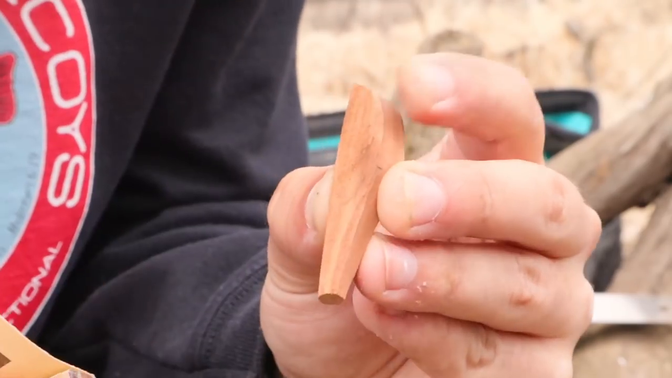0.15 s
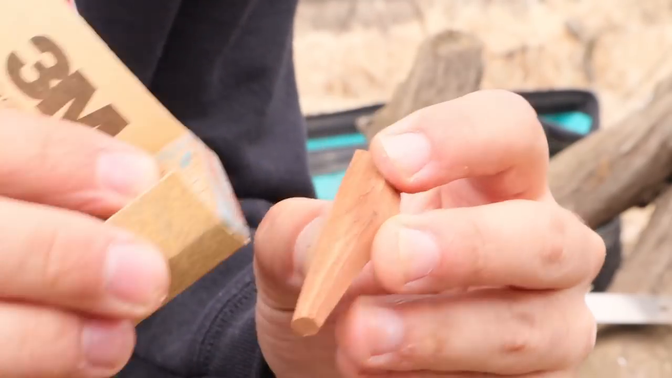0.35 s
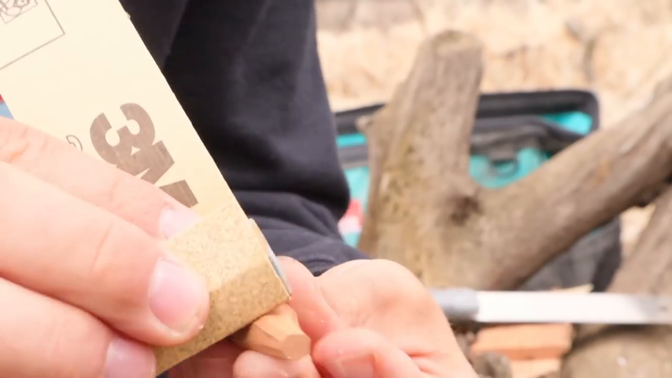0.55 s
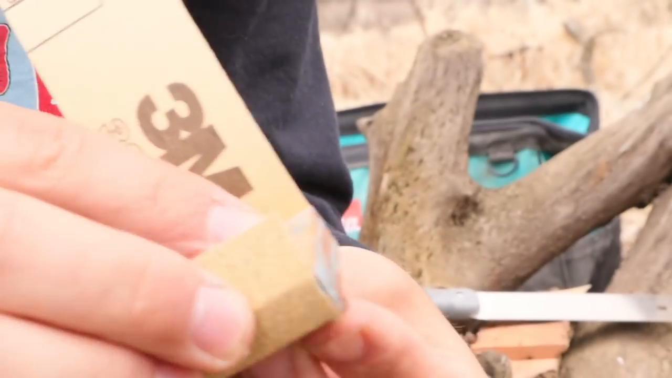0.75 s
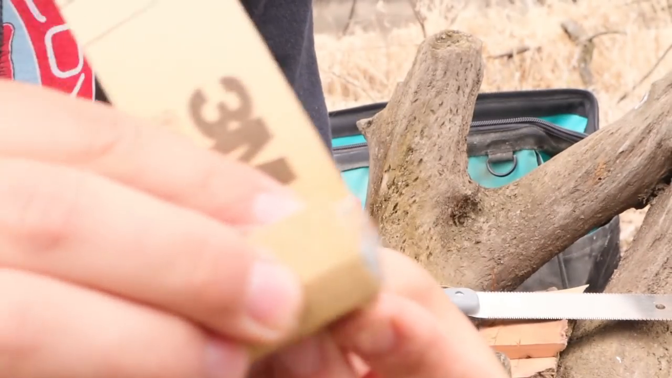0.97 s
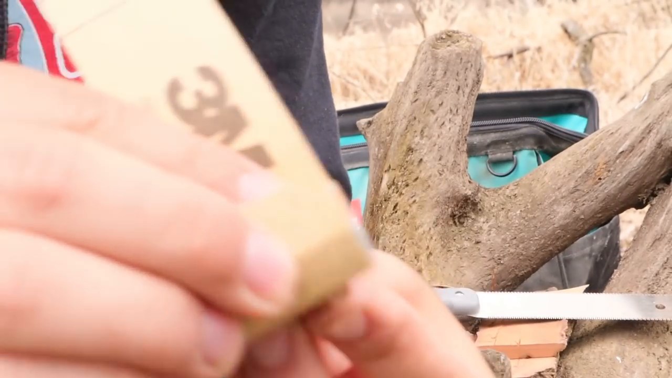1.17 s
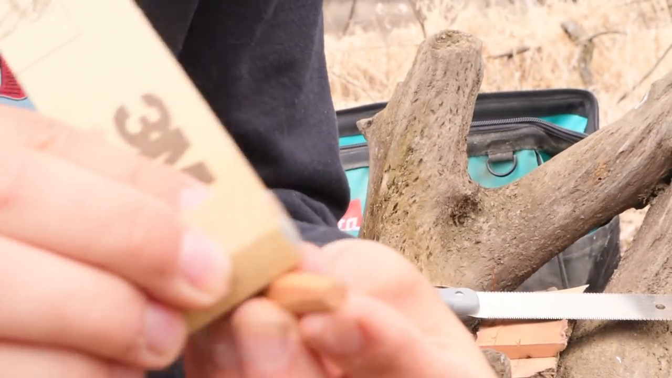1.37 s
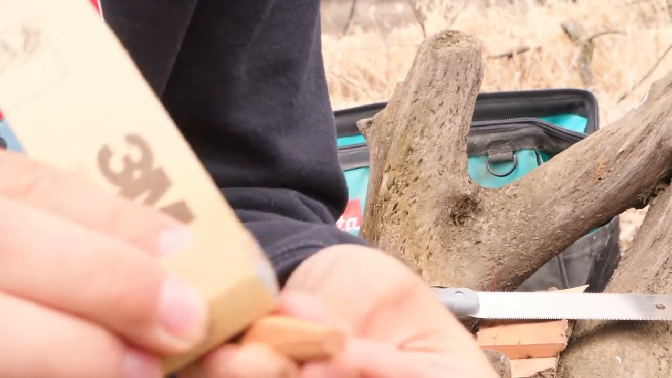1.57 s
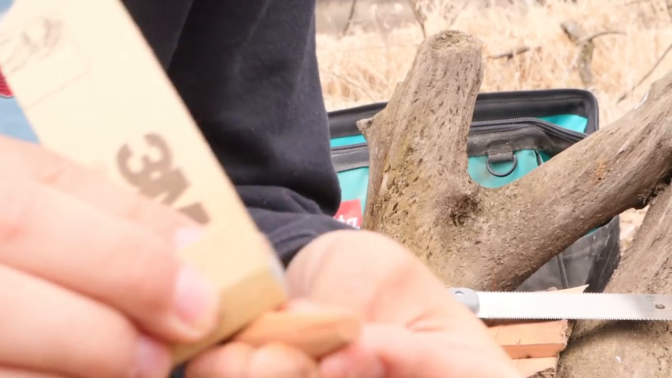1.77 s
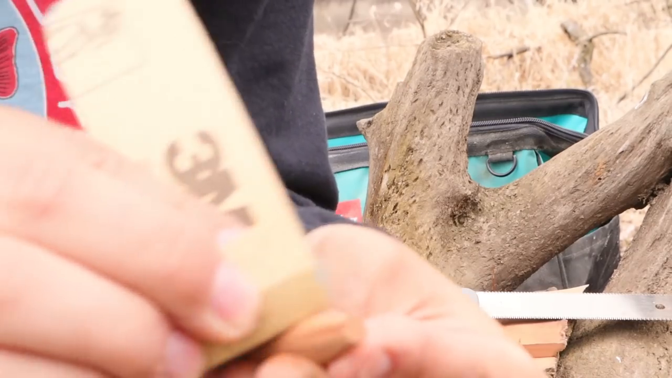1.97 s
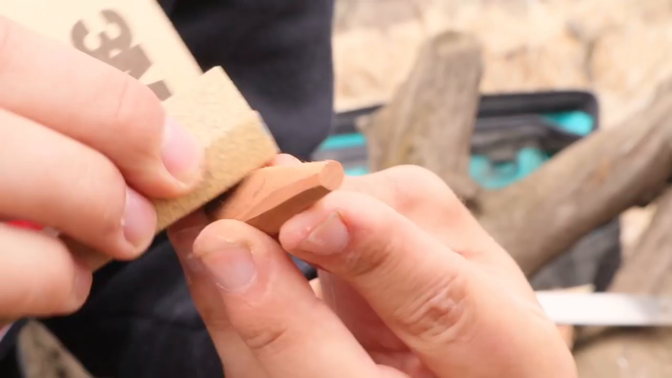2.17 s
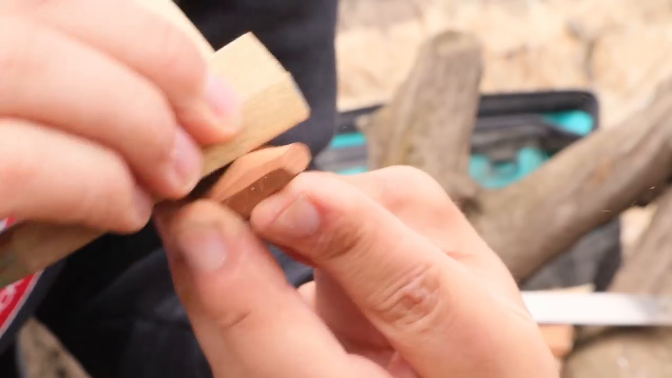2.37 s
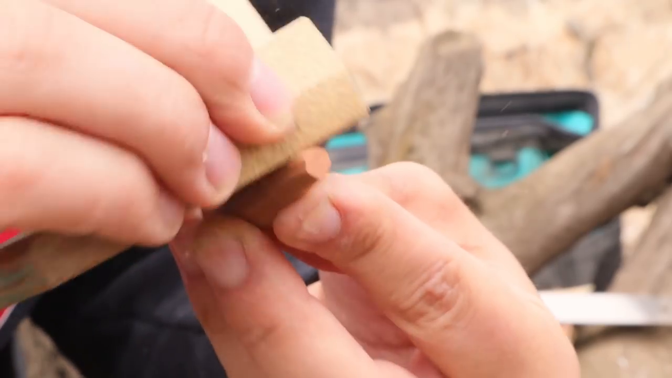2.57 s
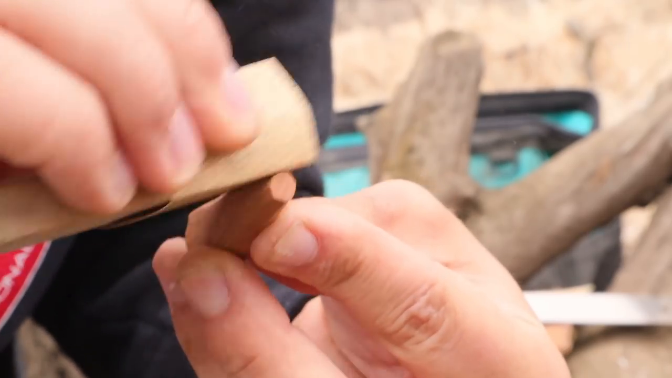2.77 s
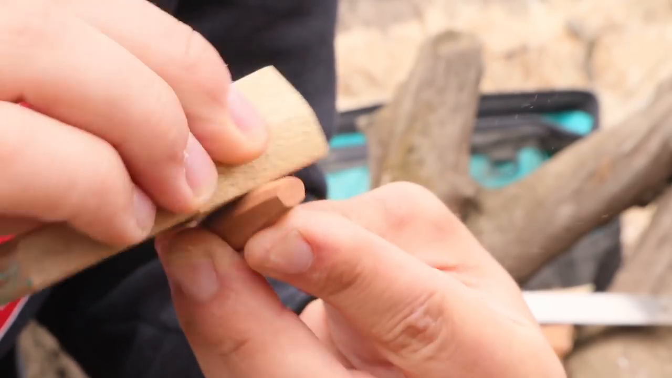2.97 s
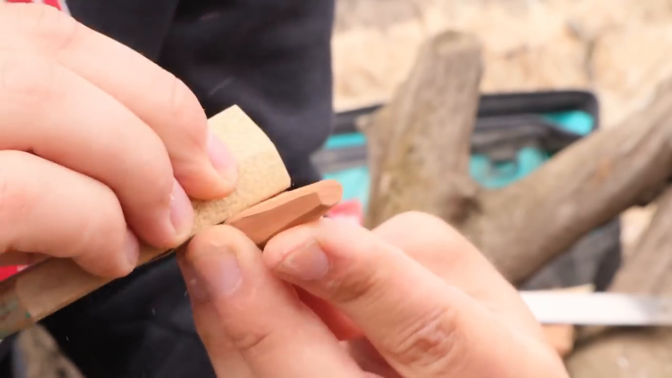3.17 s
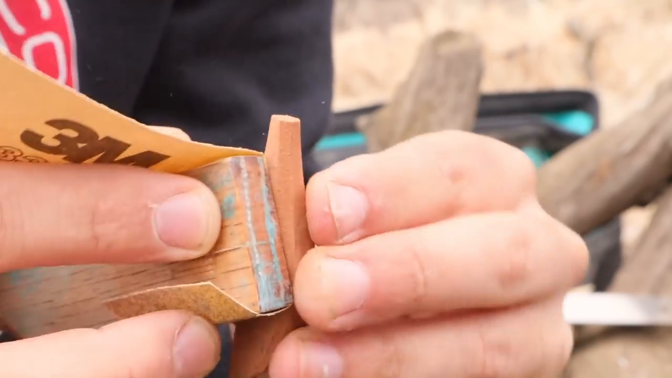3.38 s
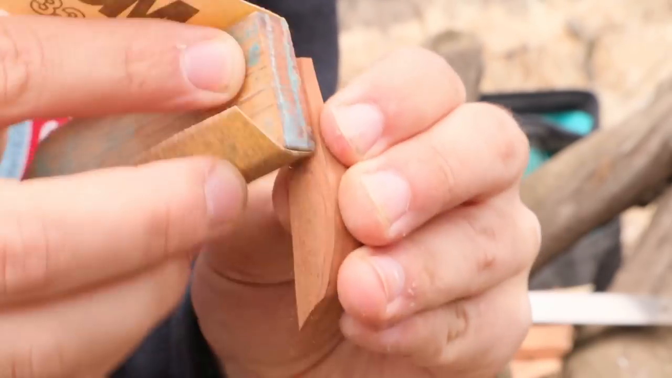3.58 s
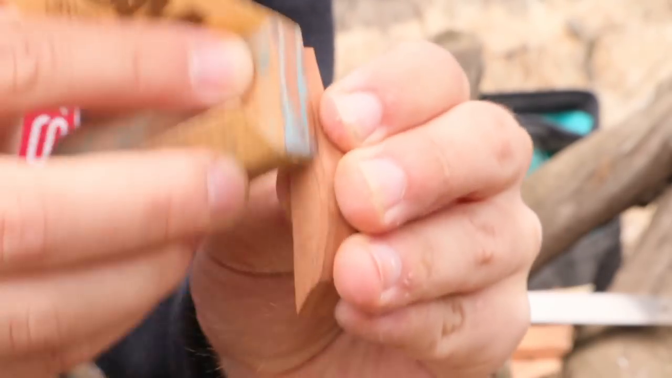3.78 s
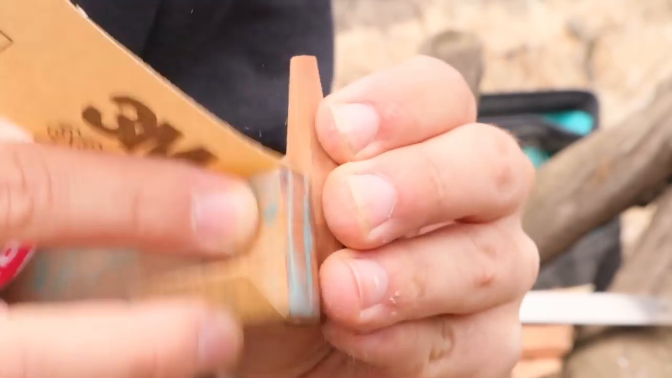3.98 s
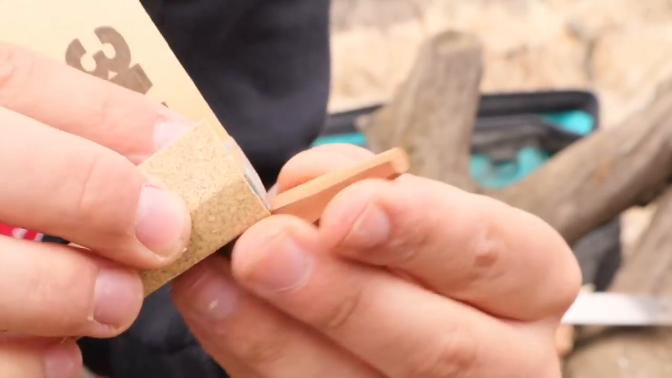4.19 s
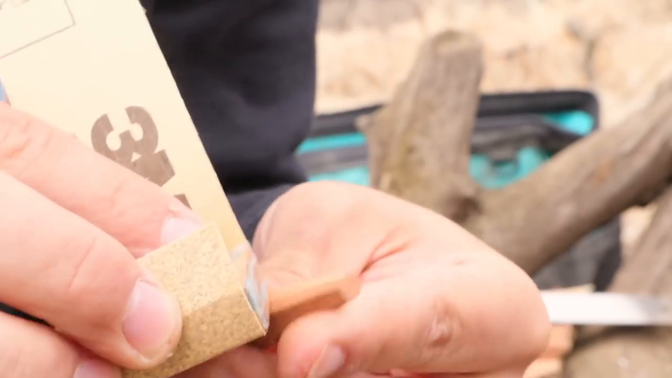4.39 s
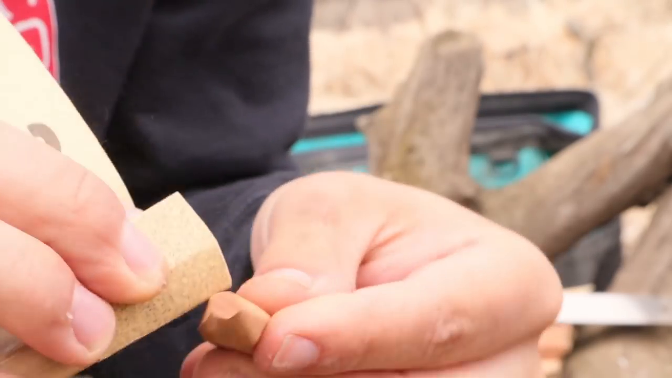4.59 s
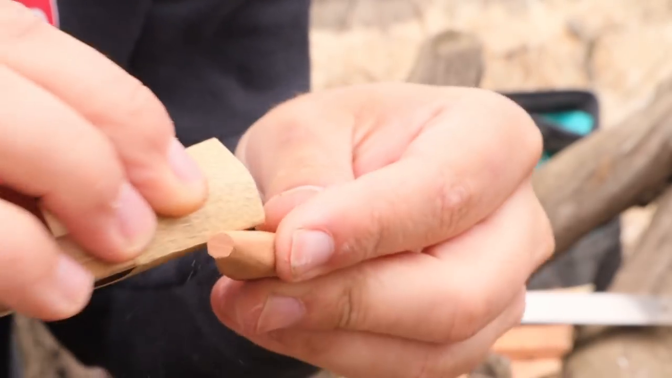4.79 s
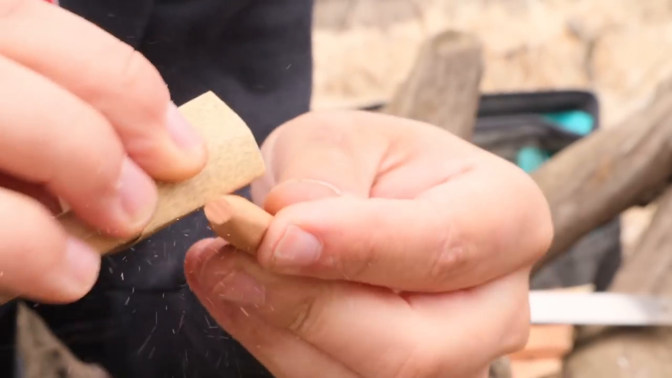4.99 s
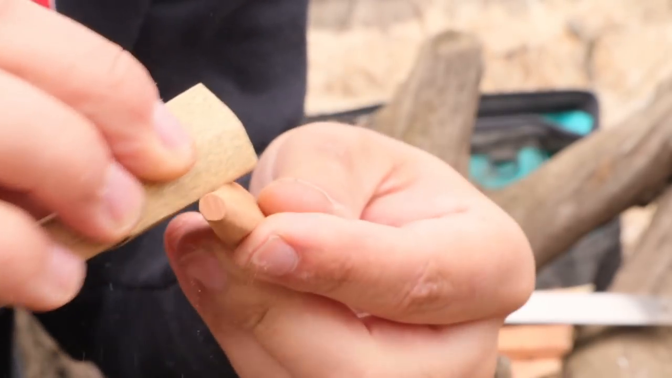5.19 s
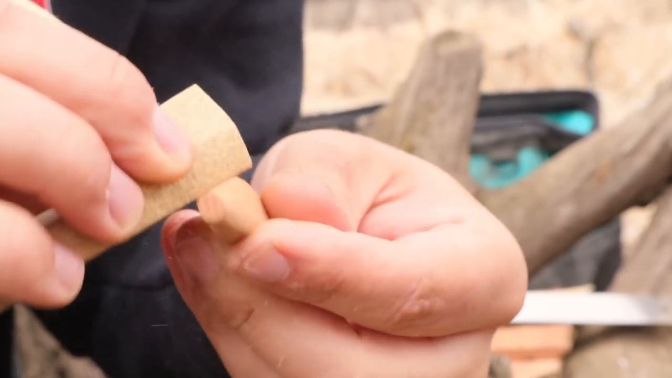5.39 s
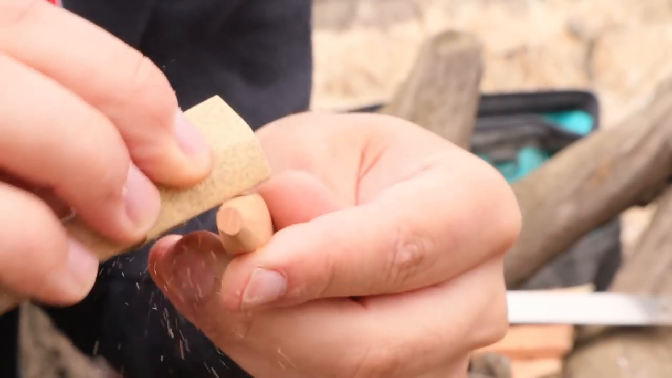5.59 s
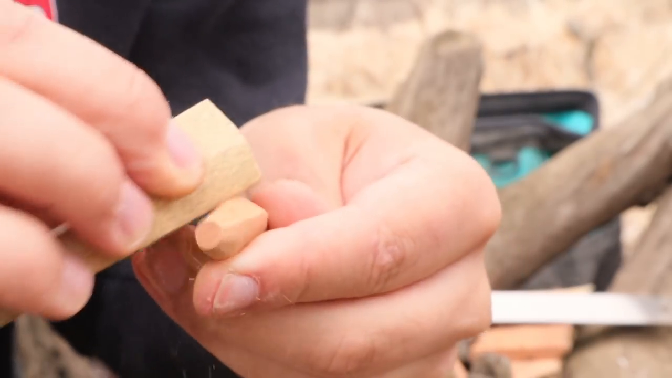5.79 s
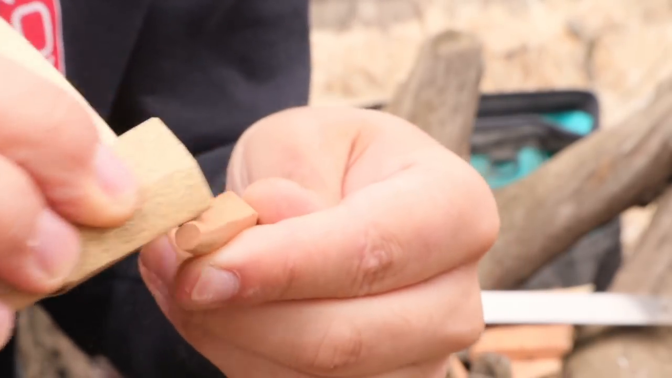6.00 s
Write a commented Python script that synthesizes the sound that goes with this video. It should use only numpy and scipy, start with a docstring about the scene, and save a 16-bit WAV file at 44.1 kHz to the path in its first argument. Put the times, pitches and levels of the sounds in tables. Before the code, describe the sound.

Quick, dry hand sanding of a small wooden piece, rasping and hissing with tiny clicks over a faint outdoor rumble.

```python
"""Outdoors, folded sandpaper is rubbed quickly back and forth over a small hand-held piece of wood.
Friction makes the sound: grit tears the fibres with a rasp and hisses while the paper slides fast.
Paper, wood and the air in the fold resonate differently in each grip, and single grains snag and click.
Behind lie a faint rumble and a far-off hum; a thin whistle passes, and the hands thud as they shift."""
import sys
import numpy as np
from scipy import signal
from scipy.fft import rfft, irfft
from scipy.io import wavfile
from scipy.ndimage import uniform_filter1d

SR = 44100
rng = np.random.default_rng(int(sys.argv[2]) if len(sys.argv) > 2 else 0)


def unload_audio(sound):
    """Save the sound as a 16-bit wav file, at the path given as the first command line argument."""
    columns = np.transpose(np.atleast_2d(sound))
    # keep every value between -1 and 1, then stretch to whole-number steps
    steps = np.round(np.clip(columns, -1, 1) * 32767)
    wavfile.write(sys.argv[1], SR, steps.astype(np.int16))


N = 266672
T = np.arange(N) / SR
BINS = np.fft.rfftfreq(N, 1 / SR)


def amp(db):
    """The decibel law: amplitude grows tenfold every 20 dB."""
    return 10 ** (np.asarray(db) / 20)


def unit(x):
    """Normalisation to an rms of 1."""
    return x / np.sqrt(np.mean(x ** 2) + 1e-20)


def colour(points):
    """A spectral envelope: gain interpolated over log frequency between (Hz, dB) points."""
    hz, db = np.transpose(points)
    return amp(np.interp(np.log(BINS + 1), np.log(hz), db))


def resonance(modes):
    """Damped resonance: modes given as (Hz, bandwidth in Hz, dB) add in power to one gain curve."""
    return np.sqrt(sum(amp(db) ** 2 / (1 + ((BINS ** 2 - hz ** 2) / (BINS * width + 1)) ** 2)
                       for hz, width, db in modes))


def shaped(x, gain):
    """Linear filtering: the spectrum is multiplied by a gain curve, and the result normalised."""
    return unit(irfft(rfft(x) * gain, N))


def wander(rate_hz):
    """Random modulation: low-passed Gaussian noise with an rms of 1."""
    return shaped(rng.standard_normal(N), np.exp(-(BINS / rate_hz) ** 2))


def grit(per_s, spread_db, patchy_db):
    """Shot noise: tiny fractures of uneven size, whose colour shifts as the contact point travels."""
    size = amp(spread_db * np.minimum(rng.exponential(1, N), 4))
    clicks = rng.choice([-1, 1], N) * size * (rng.random(N) < per_s / SR)
    spectra = signal.stft(clicks, nperseg=256, noverlap=192)[2]
    patches = uniform_filter1d(rng.standard_normal(spectra.shape), size=3, axis=0)
    patches = unit(uniform_filter1d(patches, size=13, axis=1))
    spectra *= amp(patchy_db * np.minimum(patches, 2))
    return signal.istft(spectra, nperseg=256, noverlap=192)[1][:N]


# The paper catches on the wood. Each entry: time in seconds.
CATCH_TIMES = [0.739, 0.925, 0.992, 1.031, 1.107, 1.249, 1.32, 1.34, 1.391, 1.482, 1.55, 1.667, 1.742,
               1.807, 1.847, 2.054, 2.083, 2.13, 2.998, 3.039, 3.205, 3.234, 3.259, 3.335, 3.607, 3.767,
               3.918, 3.933, 4.314, 4.726, 4.935, 4.972, 5.057, 5.27, 5.362, 5.384, 5.437, 5.474, 5.615,
               5.654, 5.784, 5.824]

def catches(depth_db=-20, fall_s=0.0038, recover_s=0.0062, light_db=-4):
    """Interrupted sliding: the gain of the hiss dips at each catch, and lightly at random as well."""
    dip_db = light_db * (.5 + .5 * np.tanh(2 * (wander(40) - 0.62)))
    for time in CATCH_TIMES:
        near = abs(T - time) < 10 * recover_s
        age = T[near] - time
        dip_db[near] += depth_db * np.exp(-(age / np.where(age < 0, fall_s, recover_s)) ** 2)
    return amp(dip_db)


# Strokes of the paper, out or back. Each row: start in seconds, length in seconds,
# relative rasp level at full speed in dB, hiss level relative to that in dB.
STROKES = [(-0.004, 0.027, -31.0, 3), (0.016, 0.064, -30, 4), (0.414, 0.062, -32.0, -7.0),
           (0.674, 0.13, -36, 3), (0.747, 0.07, -31.0, -5.5), (0.816, 0.069, -33.0, 0.5),
           (0.881, 0.078, -28.5, 1), (0.958, 0.063, -32.5, 1), (1.001, 0.065, -29.5, 0.0),
           (1.063, 0.086, -26, -1.5), (1.127, 0.094, -28, -4.5), (1.201, 0.09, -30, -1.5),
           (1.272, 0.091, -32.0, 1), (1.347, 0.076, -28, 0), (1.388, 0.12, -27.5, -2.5),
           (1.493, 0.078, -33, 4.5), (1.559, 0.055, -25.5, 1.5), (1.584, 0.14, -31, 1.5),
           (1.704, 0.069, -24, -3), (1.776, 0.061, -30.5, 2), (1.822, 0.058, -28.0, 2.5),
           (1.874, 0.091, -26, -1.5), (1.943, 0.08, -27.5, 0.0), (2.018, 0.078, -30.5, 5.5),
           (2.084, 0.088, -24, 0.0), (2.146, 0.11, -30.5, 6.5), (2.255, 0.058, -29.5, 4.5),
           (2.305, 0.074, -25.0, 1.0), (2.348, 0.098, -28.0, -1.5), (2.403, 0.15, -26.5, -2.5),
           (2.522, 0.055, -26, 1), (2.562, 0.065, -30.5, 3), (2.612, 0.081, -28.5, 0.0),
           (2.631, 0.18, -30, -2), (2.754, 0.072, -36, 4), (2.817, 0.12, -34.5, -2.5),
           (2.906, 0.056, -32.5, -0.5), (2.941, 0.11, -28.5, 0.0), (3.037, 0.027, -31.5, 10.5),
           (3.056, 0.082, -30, -1), (3.151, 0.12, -34.0, 4.5), (3.216, 0.075, -35, 12),
           (3.249, 0.12, -28, 2.5), (3.38, 0.051, -42.0, -2.5), (3.5, 0.019, -43.5, 5.5),
           (3.521, 0.12, -36, -5), (3.586, 0.09, -30.5, -1.5), (3.661, 0.062, -28, -2.5),
           (3.718, 0.067, -29.0, -3), (3.764, 0.074, -30.5, 0.5), (3.83, 0.06, -27.5, -4.5),
           (3.875, 0.13, -29.5, -0.5), (3.986, 0.072, -34.0, -2), (4.17, 0.1, -45, -2),
           (4.242, 0.131, -40.5, 0.0), (4.314, 0.27, -54.5, -1.5), (4.611, 0.1, -41.5, -0.5),
           (4.694, 0.068, -35.5, 2), (4.739, 0.1, -34.5, -0.5), (4.831, 0.065, -31.5, 1),
           (4.884, 0.058, -30, 0.5), (4.911, 0.1, -30.5, -1.5), (5.007, 0.081, -31, -0.5),
           (5.075, 0.05, -32.5, -1), (5.106, 0.078, -31, -2), (5.176, 0.059, -31.0, -0.5),
           (5.225, 0.1, -32, 0), (5.312, 0.1, -31.5, 0.0), (5.37, 0.12, -32.5, 4.5),
           (5.411, 0.17, -32.0, 0.5), (5.547, 0.098, -32.0, -0.5), (5.606, 0.085, -32.5, 0.5),
           (5.679, 0.061, -30.0, -2.5), (5.714, 0.1, -32.5, -4.5), (5.768, 0.112, -32.0, -0.5),
           (5.858, 0.068, -31.5, -1), (5.905, 0.15, -32, -2.5), (5.982, 0.073, -36.5, 1.5)]
# The resting paper barely scuffs. Each row: start in seconds, length in seconds, relative level in dB.
SCUFFS = [(0.457, 0.25, -58), (3.428, 0.067, -53)]

def strokes(stick_speed=0.53, stick_softness=0.061, hiss_floor_db=-21):
    """Sliding friction: the rasp and hiss envelopes rise with speed; the hiss cuts as the paper sticks."""
    rasp_power, hiss_power = np.zeros(N), np.zeros(N)
    for start, length, db, hiss_db in STROKES:
        during = (T > start) & (T < start + length)
        progress = ((T[during] - start) / length) ** .95  # fastest a little before the middle
        speed = abs(np.sin(np.pi * progress))  # share of full speed
        sliding = np.where(progress < .5, 1, .5 + .5 * np.tanh((speed - stick_speed) / stick_softness))
        rasp_power[during] += (amp(db) * speed ** 1.195) ** 2
        hiss_power[during] += (amp(db + hiss_db) * speed ** 0.96 * sliding) ** 2
    for start, length, db in SCUFFS:
        rasp_power += amp(db) ** 2 * abs(np.sin(np.pi * np.clip((T - start) / length, 0, 1)))
    hiss_power = hiss_power * catches() ** 2 + amp(hiss_floor_db) ** 2 * rasp_power
    return np.sqrt(rasp_power), np.sqrt(hiss_power)


# The fingers take a new grip. Each entry: start in seconds.
GRIP_TIMES = [0, 2.25, 3.15, 3.45, 4.15]
# Modes of paper and wood, one list a grip. Each row: frequency in Hz, bandwidth in Hz, gain in dB.
GRIP_MODES = [
    [(1935, 620, -7), (3090, 340, -2), (4040, 1000, -5), (5105, 203, 1), (5770, 200, 0.5),
     (8000, 3200, -7.5), (10900, 2300, -7.5)],
    [(1670, 560, -10.5), (2670, 500, -6.5), (3550, 610, -8), (4280, 490, -7), (5260, 220, -1.5),
     (5950, 180, 2.5), (6760, 300, -5.5), (8160, 1500, -5), (10300, 2700, -5)],
    [(2000, 700, -15), (3100, 1100, 5), (4040, 1300, 2.5), (4960, 1100, 8), (6230, 300, -10),
     (7100, 900, 4), (8800, 900, 4), (10500, 3000, 7.5)],
    [(1730, 410, -1), (2240, 1700, -3.5), (4070, 730, 2.5), (4920, 310, -1.5), (5920, 240, -3.5),
     (6850, 700, -14), (10600, 2400, -12.5)],
    [(1900, 1100, -4.5), (2795, 390, 2), (3850, 670, 2.5), (5280, 960, 2.5), (5750, 250, -7),
     (6930, 300, 0), (9270, 2100, -2), (10300, 1000, -6.5)],
]
# The overall spectrum of the grit. Each row: frequency in Hz, relative level in dB.
GRIT_COLOUR = [(200, -1), (550, -1), (900, 4), (1500, -1.5), (6500, -2), (7500, -5.5), (10500, -5),
               (12000, -5.5), (14000, -3.5), (16000, -11.5)]

def paper_and_wood(excitation, band):
    """Forced vibration: the grit drives the modes of paper and wood, cross-faded from grip to grip."""
    grip = np.searchsorted(GRIP_TIMES[1:], T)
    gain = band * colour(GRIT_COLOUR)
    return sum(uniform_filter1d(1. * (grip == k), size=400) * shaped(excitation, gain * resonance(modes))
               for k, modes in enumerate(GRIP_MODES))


# The hollow of folded paper and cupped fingers in each grip.
# Each row: resonant frequency in Hz, relative level in dB.
GRIP_HOLLOWS = [(1345, -39.5), (1343, -39.5), (1350, -37), (1610, -49.5), (1330, -39)]

def hollow(rasp, usual_rasp_db=-32, pole_width_hz=420, drift=0.085):
    """Cavity resonance: grit rings the air in the fold, whose pitch drifts as the fingers move."""
    grip = np.searchsorted(GRIP_TIMES[1:], T)
    hz, level_db = uniform_filter1d(np.array(GRIP_HOLLOWS, float)[grip], size=2000, axis=0).T
    carrier = np.exp(2j * np.pi * np.cumsum(hz * (1 + drift * wander(5))) / SR)
    pole = np.exp(-np.pi * pole_width_hz / SR)
    clicks = grit(per_s=2500, spread_db=3.0, patchy_db=4.5)
    # shifting down, low-passing and shifting back gives a resonance that follows the carrier
    ring = carrier * signal.lfilter([1], np.poly([pole, pole]), clicks / carrier)
    drive = (abs(uniform_filter1d(rasp, size=800)) / amp(usual_rasp_db)) ** 0.57
    return amp(level_db - 1) * drive * unit(ring.real)


def sanding(edge_hz=5450, rasp_db=0.7, flicker_above_hz=11000):
    """Friction noise, heard as a low rasp and a high hiss, with the hollow beneath.
    The sharp edge between them and the flickering top treble are probably an audio coder's trace."""
    rasp_envelope, hiss_envelope = strokes()
    low_band = 1 / np.sqrt(1 + (BINS / edge_hz) ** 70)
    high_band = np.sqrt(1 - low_band ** 2)
    judder = unit(amp(2.5 * wander(110)))  # the paper sticks and slips on the grain
    rasp = rasp_envelope * paper_and_wood(grit(per_s=11000, spread_db=0.4, patchy_db=3.5), low_band)
    hiss = hiss_envelope * paper_and_wood(grit(per_s=14000, spread_db=2.5, patchy_db=3.4), high_band)
    treble = irfft(rfft(hiss) * (BINS > flicker_above_hz), N)
    flicker = unit(amp(1.5 * wander(45)))
    hiss += treble * (flicker - 1)
    return judder * (amp(rasp_db) * rasp + hiss) + hollow(rasp_envelope)


def scatter(x, echo_db=-18, delay_s=.002, decay_s=.004):
    """Early reflection: the body and the ground return a weak, brief echo."""
    t = T[:4096]
    taps = rng.standard_normal(len(t)) * np.exp(-t / decay_s) * (t > delay_s)
    return x + amp(echo_db) * signal.fftconvolve(x, taps / np.linalg.norm(taps))[:N]


# The spectrum of the outdoor background. Each row: frequency in Hz, relative spectral density in dB.
RUMBLE_COLOUR = [(20, -19), (45, -0.5), (80, 1.5), (130, 0.5), (330, -8), (560, -9.5), (790, -5.5),
                 (1300, -10.5), (1700, -18.5), (2100, -15), (2700, -25.5), (4200, -29), (5200, -29.5),
                 (16000, -32)]

def rumble(db=-45.5, gust_db=2, gust_below_hz=110):
    """Amplitude modulation of noise: a distant rumble gusts only in the bass."""
    air = amp(db) * shaped(rng.standard_normal(N), colour(RUMBLE_COLOUR))
    bass = irfft(rfft(air) * np.exp(-(BINS / gust_below_hz) ** 2), N)
    return air + bass * (amp(gust_db * wander(7.2)) - 1)


# The far-off hum swells and fades. Each row: time in seconds, relative level in dB.
HUM_LEVELS = [(0, -45), (2.1, -60), (2.5, -47), (3.1, -46), (3.65, -55.5), (4.05, -43), (4.5, -44),
              (5.0, -48.5), (5.3, -54), (6.05, -52.5)]

def hum(hz=86.8, waver_hz=1.13):
    """Line broadening: wavering pitch and noise in quadrature blur a low tone."""
    phase = 2 * np.pi * np.cumsum(hz + waver_hz * wander(5.8)) / SR
    tone = np.sin(phase) + wander(14) * np.cos(phase)
    level_db = np.interp(T, *np.transpose(HUM_LEVELS))
    return amp(level_db - 1) * tone


# Grains that catch and let go. Each row: start in seconds, relative level in dB,
# ringing frequency in Hz, decay time in seconds.
SNAGS = [(0.046, -25.5, 5450, .0098), (0.438, -16, 5750, 0.0021), (0.445, -20, 2300, 0.0049),
         (0.496, -33, 2440, 0.0029), (0.562, -33, 8000, .0015), (0.593, -22, 8400, 0.0018),
         (0.615, -35, 3120, 0.0045), (0.731, -24.5, 3100, 0.0032), (1.073, -22, 4070, .005),
         (1.089, -22, 4370, 0.0023), (1.476, -19.5, 4530, 0.0039), (1.897, -20, 5400, 0.0042),
         (2.171, -15, 3200, 0.0077), (2.272, -22, 5940, .0056), (2.463, -13.5, 5800, 0.0048),
         (2.5, -14, 5700, 0.0051), (3.187, -22.5, 1900, 0.0076), (3.243, -20, 6230, 0.0054),
         (3.343, -20.5, 3500, .0033), (3.51, -30, 4470, 0.0072), (4.083, -16.5, 11240, 0.0016),
         (4.225, -28.5, 4940, 0.0064), (4.266, -29.5, 5560, 0.014), (4.597, -22, 2810, 0.0012),
         (4.658, -21.5, 5600, 0.0029), (5.495, -18, 5630, 0.0038), (5.959, -18.5, 5180, 0.0063)]

def snags(width_hz=380, crack_db=-17, attack_s=.0005):
    """Free decay: a caught grain lets go with a short, broad crack and one ringing pitch."""
    out = np.zeros(N)
    for start, db, hz, decay_s in SNAGS:
        gain = resonance([(hz, width_hz, 0), (4500, 6500, crack_db)]) * colour(GRIT_COLOUR)
        age = np.maximum(T - start, 0)
        envelope = (1 - np.exp(-age / attack_s)) * np.exp(-age / decay_s)
        out += amp(db) * envelope * shaped(rng.standard_normal(N), gain)
    return out


def whistle(hz=2130, waver_hz=90, db=-61, fading_db=4):
    """Frequency modulation: a very faint whistle, perhaps a far bird, wavers in the first pause."""
    phase = 2 * np.pi * np.cumsum(hz + waver_hz * wander(10.4)) / SR
    envelope = np.interp(T, [.08, .3, .4, .43], [0, 1, 1, 0])
    return amp(db) * envelope * unit(amp(fading_db * wander(13)) * np.sin(phase))


# The hands shift. Each row: time of the peak in seconds, level in dB, centre frequency in Hz.
THUDS = [(2.22, -38, 40), (4.1, -45, 95), (4.11, -46.5, 258)]

def thuds(half_length_s=0.038):
    """Damped impact: the hands knock softly, each a swell of low noise that does not ring on."""
    out = np.zeros(N)
    for time, db, hz in THUDS:
        envelope = np.exp(-((T - time) / half_length_s) ** 2)
        out += amp(db) * envelope * shaped(rng.standard_normal(N), resonance([(hz, 60, 0)]) ** 2)
    return out


def scene():
    """Superposition: the sanding close by and the outdoors behind add in one channel."""
    return (scatter(sanding() + snags()) + rumble() + hum() + whistle() + thuds())[None]


def record(dry, cutoff_hz=15820):
    """Band limiting: a steep low-pass filter removes the highest treble."""
    low_pass = signal.firwin(511, cutoff_hz, window=("kaiser", 9), fs=SR)
    return signal.oaconvolve(dry, low_pass[None], "same")


dry = scene()
out = record(dry)
unload_audio(out)
```